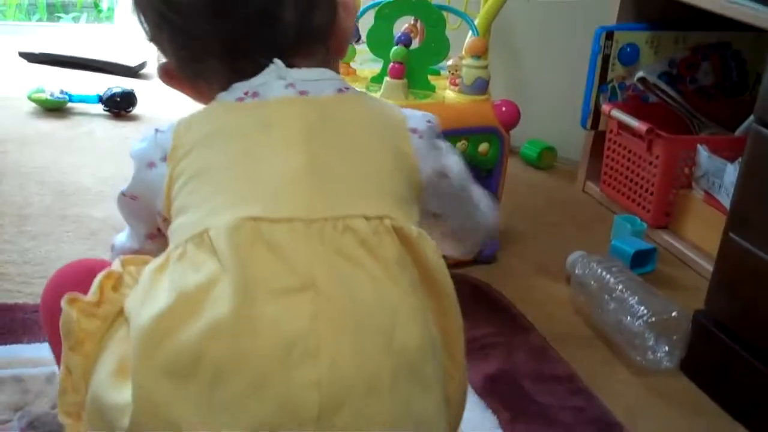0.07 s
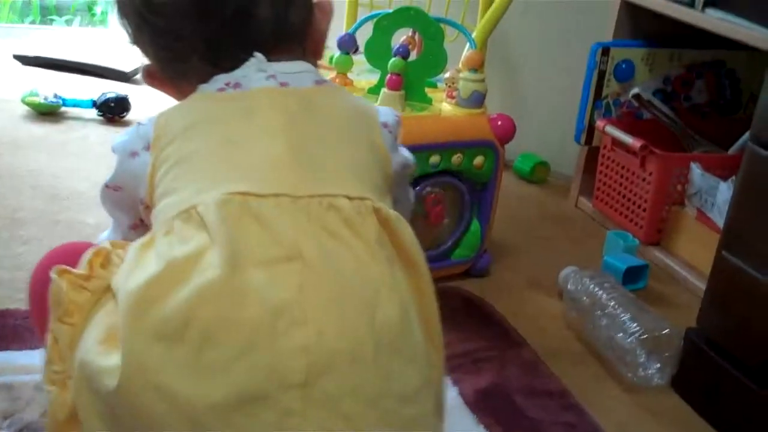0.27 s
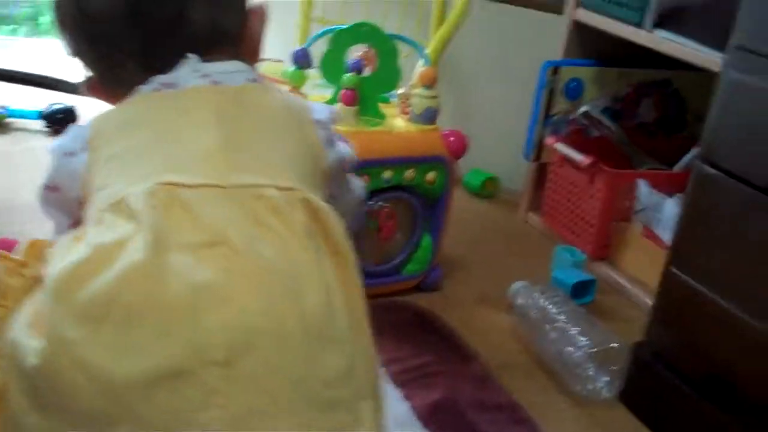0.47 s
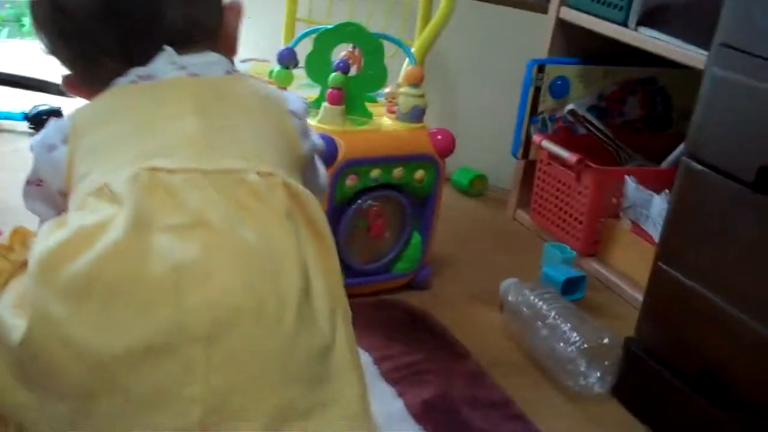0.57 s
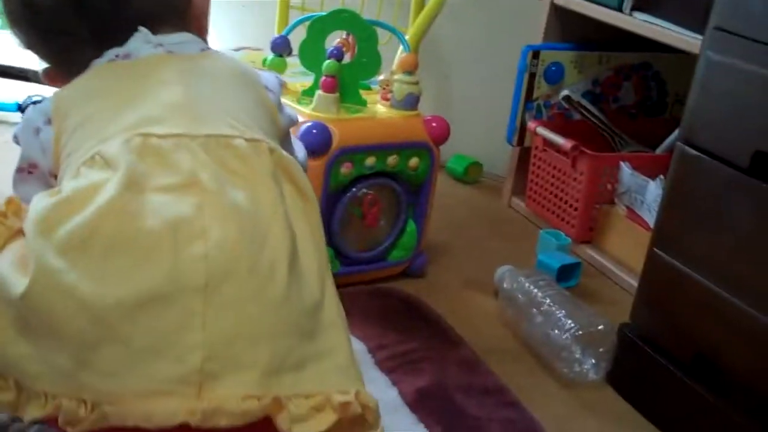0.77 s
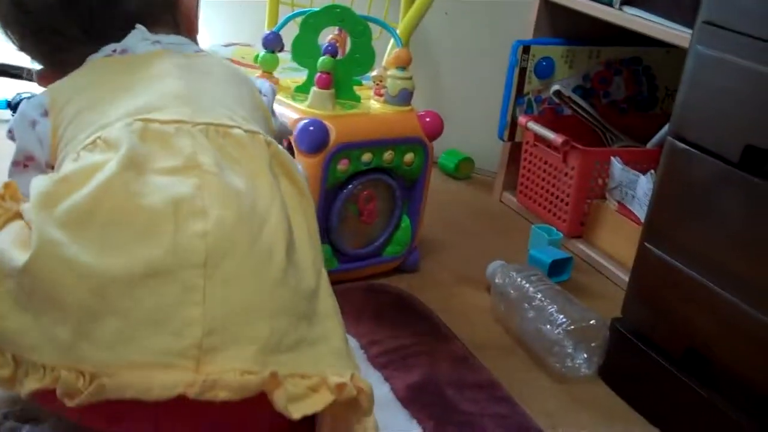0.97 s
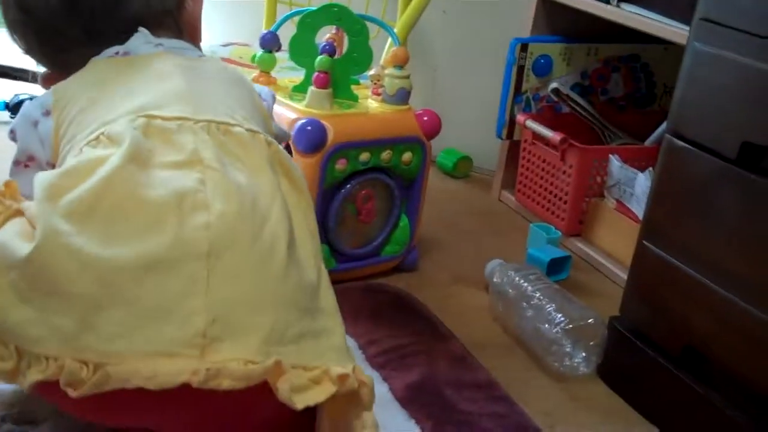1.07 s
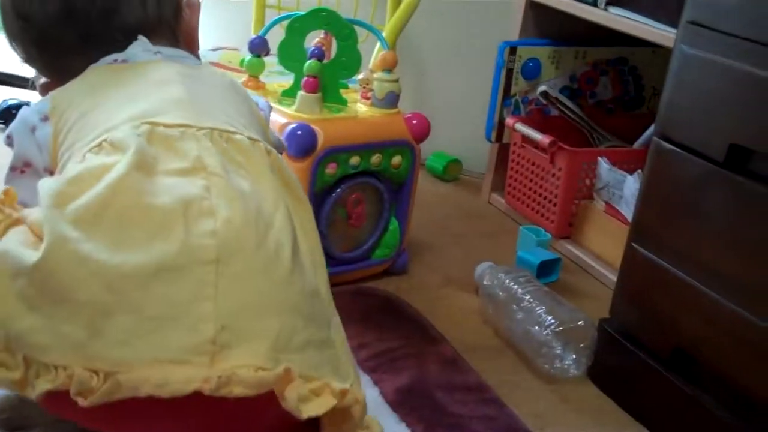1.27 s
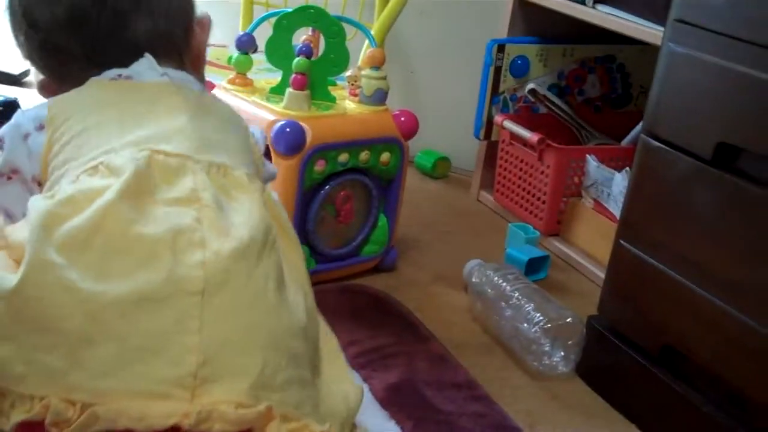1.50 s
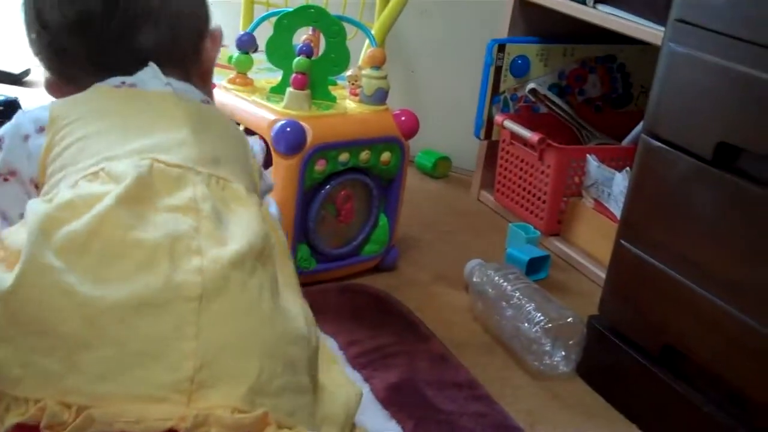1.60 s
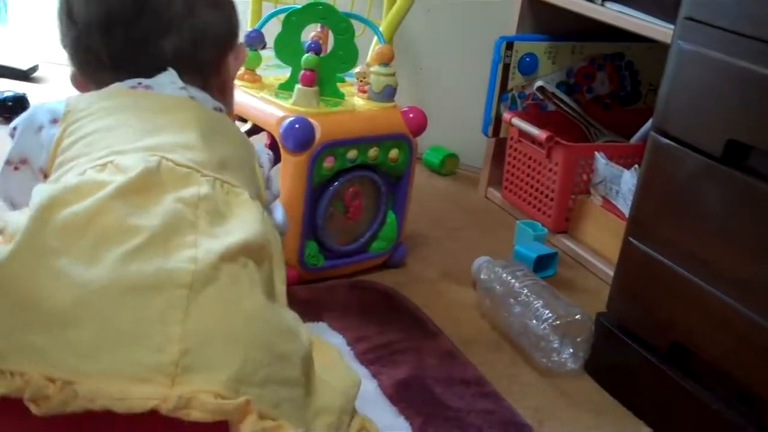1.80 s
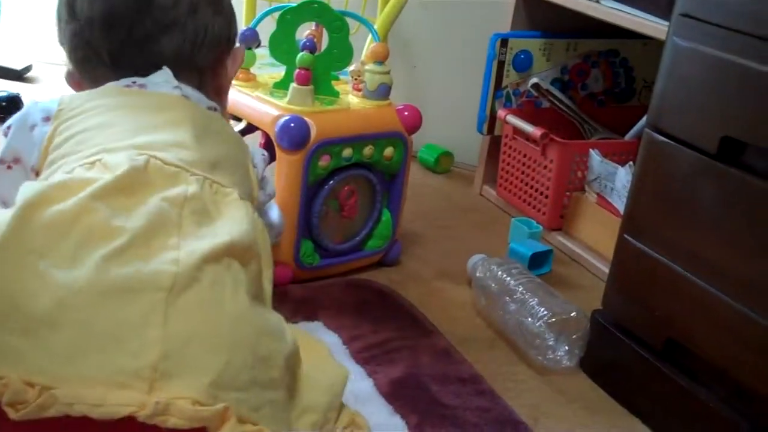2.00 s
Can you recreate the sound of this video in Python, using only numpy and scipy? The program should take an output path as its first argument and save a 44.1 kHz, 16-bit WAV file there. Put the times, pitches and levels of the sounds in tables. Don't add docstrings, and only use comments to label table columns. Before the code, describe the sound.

An empty plastic bottle clatters on a wooden floor in a small furnished room, heard close. Faint hush and cloth rustle, then a sharp double crack at 0.2 s. A light tap follows at 0.3, sliding rub and ticks around 0.5-0.7. The loudest impact comes at 0.95, a hollow bounce at 1.1, soft taps near 1.4, rolling knocks with small dent pops 1.55-1.8, then faint shuffles at 2.0.

```python
import sys
import numpy as np
from scipy import signal
from scipy.fft import rfft, irfft, next_fast_len
from scipy.io import wavfile
from scipy.ndimage import uniform_filter1d

SR = 44100
rng = np.random.default_rng(int(sys.argv[2]) if len(sys.argv) > 2 else 0)


def unload_audio(sound):
    columns = np.transpose(np.atleast_2d(sound))
    steps = np.round(np.clip(columns, -1, 1) * 32767)
    wavfile.write(sys.argv[1], SR, steps.astype(np.int16))


def undo_db(level):
    steps = np.asarray(level, float) / 20
    return 10 ** steps


N = 90404
CONTACT_N = 1 << 15
TAIL_N = CONTACT_N // 2
ROOM_TOP_HZ, TOP_HZ = 14300, 15900


def unit(x):
    return x / np.sqrt(np.mean(x ** 2) + 1e-20)


def along(points, hz):
    f, v = np.transpose(points)
    return np.interp(np.log(hz + 1), np.log(f + 1), v)


def gain_at(points):
    return undo_db(np.interp(np.arange(N) / SR, *np.transpose(points)))


def stereo_noise(n, alike, patchy_db, shape, size=256):
    hz, t, z = signal.stft(rng.standard_normal((2, n)), SR, nperseg=size)
    patches = uniform_filter1d(rng.standard_normal(z.shape[1:]), 4, 0)
    patches = uniform_filter1d(patches, 8, 1)
    turn = np.arccos(np.clip(along(alike, hz), -1, 1))[:, None] / 2
    mid, side = z[0] * np.cos(turn), z[1] * np.sin(turn)
    z = np.array([mid + side, mid - side])
    z = z * shape(hz[:, None], t) * undo_db(patchy_db * unit(patches))
    return unit(signal.istft(z, SR, nperseg=size)[1][:, :n])


def resonances(peaks, f, low_hz):
    scatter_db, scatter_ratio = 1.5, .006
    scatter = rng.standard_normal((len(peaks), 2))
    modes = []
    for k, (hz, width_hz, db) in enumerate(peaks):
        gain = (-1) ** k * undo_db(db + scatter_db * scatter[k, 0])
        centre_hz = hz * (1 + scatter_ratio * scatter[k, 1])
        damping = 1j * f * width_hz
        modes.append(gain * damping / (centre_hz ** 2 - f * f + damping))
    modes = np.array(modes) * (1j * f / (low_hz + 1j * f)) ** 3
    power = np.sum(abs(modes) ** 2, 0)
    return np.array([modes.sum(0), np.sqrt(power)]) / np.sqrt(power.mean())


# freq_hz, density_db_per_hz
HUSH_COLOUR = [(25, -7), (80, -1), (300, -5.5), (1000, -7), (3500, -13), (7300, -5.5), (10000, -20.5),
               (14200, -22.5)]
# freq_hz, left_right_likeness
HUSH_ALIKE = [(60, 0.84), (240, 0.34), (950, 0.52), (3770, 0.057), (15000, 0.06)]


def hush():
    colour = lambda hz, t: undo_db(along(HUSH_COLOUR, hz)) * (hz < ROOM_TOP_HZ)
    return undo_db(-53.5) * stereo_noise(N, HUSH_ALIKE, 1.2, colour, size=2048)


# time_s, level_db
RUSTLE = [(0, -85), (.11, -60), (.19, -81), (.5, -64), (.6, -51), (.75, -77), (1.3, -71), (1.5, -59),
          (1.9, -72), (2.05, -70)]
# freq_hz, density_db_per_hz
CLOTH_COLOUR = [(1500, -40), (4000, 55), (6000, 73), (7300, -77), (8500, -39), (12000, -57)]
# freq_hz, left_right_likeness
ROOM_ALIKE = [(300, 0.99), (1000, 0.92), (3000, 0.25), (8000, 0.012)]


def cloth():
    colour = lambda hz, t: undo_db(along(CLOTH_COLOUR, hz)) * (hz < ROOM_TOP_HZ)
    return gain_at(RUSTLE) * stereo_noise(N, ROOM_ALIKE, 3.5, colour)


# time_s, level_db
RUB = [(.44, -83), (.49, -61), (.55, -57.5), (.6, -52.5), (.66, -53), (.75, -63), (.82, -75)]
# freq_hz, width_hz, level_db
RUB_WALL = [(1080, 360, -13), (1810, 110, 14), (2600, 600, -17)]


def rub():
    colour = lambda hz, t: resonances(RUB_WALL, hz[:, 0], 600)[1, :, None] * (hz < ROOM_TOP_HZ)
    return gain_at(RUB) * stereo_noise(N, ROOM_ALIKE, 1.7, colour, size=1024)


# freq_hz, t60_s
ROOM_DECAY = [(200, 0.11), (500, 0.33), (2000, 0.27), (6000, 0.25), (12000, 0.17)]


def room_tail():
    gap_s, rise_s = 0.00083, 0.0028
    decay = lambda hz, t: undo_db(-60 * t / np.clip(along(ROOM_DECAY, hz), .05, .6))
    tail = stereo_noise(TAIL_N, ROOM_ALIKE, 2.2, decay) / np.sqrt(TAIL_N)
    since_s = np.clip(np.arange(TAIL_N) / SR - gap_s, 0, 1)
    return tail * (1 - np.exp(-since_s / rise_s))


def blow_spectrum(blow_s):
    t = np.arange(CONTACT_N) / SR
    blow = rfft(rng.standard_normal(CONTACT_N) * (t / blow_s) * np.exp(-t / blow_s))
    return blow / np.sqrt(uniform_filter1d(abs(blow) ** 2, size=600) + 1e-9)


# freq_hz, width_hz
BROAD_WALL = (1370, 1500)
# freq_hz, width_hz
BROAD_CRACK = (4600, 4400)
# freq_hz, left_minus_right_db
TREBLE_LEFT = [(6200, 0), (8000, 11), (10000, 13), (12000, 9)]
# freq_hz, left_lead_rad
TREBLE_FLIP = [(4000, 0), (8000, 1.05), (11500, 3.5)]


def contacts(rows, air, wall, crack, blow_s, gain_db, wet_db, cut_hz, pan_db, damping, top_hz=ROOM_TOP_HZ):
    out = np.zeros((2, N + CONTACT_N))
    t, f = np.arange(CONTACT_N) / SR, np.fft.rfftfreq(CONTACT_N, 1 / SR)
    side = np.array([[.5], [-.5]])
    shade_db = along(TREBLE_LEFT, f)
    lead = np.exp(1j * side * along(TREBLE_FLIP, f))

    def damped(peaks, broad):
        return [(hz, w + hz * abs(damping), db) for hz, w, db in peaks] + [(*broad, -5.5)]

    for start_s, wall_db, hollow_db, crack_db, sharp_db in rows:
        blow = blow_spectrum(blow_s)
        parts = np.array([
            undo_db(wall_db) * resonances(damped(wall, BROAD_WALL), f, cut_hz),
            undo_db(hollow_db + 11.5) * resonances(air, f, 53),
            undo_db(crack_db + 10) * resonances(damped(crack, BROAD_CRACK), f, 2170)])
        body = parts[:, 0].sum(0)
        spread = np.linalg.norm(parts[:, 1], axis=0)
        direct = blow * body * (f < top_hz) * undo_db(sharp_db + side * (pan_db + shade_db)) * lead
        room_gain = undo_db(wet_db + side * (0.5 + 0.95 * shade_db))
        room = room_gain * spread * (f < ROOM_TOP_HZ) * rfft(room_tail(), CONTACT_N)
        sound = irfft(direct + room, CONTACT_N) * np.clip(6 - 10 * t, 0, 1)
        out[:, round(start_s * SR):][:, :CONTACT_N] += undo_db(gain_db) * sound
    return out[:, :N]


# freq_hz, width_hz, level_db
HELD_AIR = [(353, 162, -0.5), (470, 310, -2), (956, 154, -2.5)]
# freq_hz, width_hz, level_db
TAP_WALL = [(1070, 130, 1), (1880, 110, 5), (2350, 100, 3)]
TAP_CRACK = [(3660, 900, 4.2)]
# start_s, pitch_hz, width_hz, level_db
POPS = [(0.957, 4760, 160, -10.5), (0.9631, 4010, 120, -17), (1.007, 4860, 80, -43),
        (1.248, 1560, 110, -30.5), (1.268, 4250, 160, -37), (1.2868, 6960, 4000, -34.5),
        (1.359, 4250, 200, -43), (1.376, 4300, 130, -42.5), (1.477, 7300, 600, -36.5),
        (1.424, 323, 40, -33.5), (0.205, 1160, 150, -21.5), (0.2045, 80, 200, -35.5), (0.26, 400, 60, -41),
        (0.66, 3700, 1200, -31.5), (1.0906, 7600, 500, -15), (1.27, 900, 250, -33),
        (1.434, 2100, 50, -31.5), (1.584, 1590, 35, -27), (1.645, 2670, 120, -26), (1.7242, 1310, 120, -26),
        (1.778, 2140, 50, -25), (0.668, 2220, 120, -35), (0.972, 1400, 60, -16), (0.934, 1100, 150, -26),
        (1.094, 940, 200, -23), (1.14, 404, 25, -28)]


def pops():
    out = 0
    for start_s, pitch_hz, width_hz, level_db in POPS:
        out = out + contacts([(start_s, level_db, -99, -99, 0)], HELD_AIR, [(pitch_hz, width_hz, 18)],
                             TAP_CRACK, blow_s=0.001, gain_db=16, wet_db=-1, cut_hz=pitch_hz / 2,
                             pan_db=4.5, damping=0)
    return out


# start_s, wall_db, hollow_db, crack_db, sharp_db
TAPS = [
    (0.3039, -29, -75, -35, 3.5),
    (0.6327, -46, -43, -42, -7),
    (0.661, -21.5, -45, -35, -2.5),
    (0.6703, -34, -58, -46, 7),
    (0.7, -47, -72, -63, -4),
    (1.4006, -40, -45, -44.5, -1),
    (1.4245, -21.5, -42.5, -42, -2),
    (1.4392, -32, -50, -47, 2),
    (1.4796, -47, -44, -47, 1.5),
]


def taps():
    return contacts(TAPS, HELD_AIR, TAP_WALL, TAP_CRACK, blow_s=0.0015, gain_db=14.5,
                    wet_db=1, cut_hz=1220, pan_db=1.5, damping=.03)


# start_s, wall_db, hollow_db, crack_db, sharp_db
TICKS = [
    (0.5521, -20, -54, -26.5, -0.6),
]
# freq_hz, width_hz, level_db
TICK_WALL = [(2460, 3600, 0)]
TICK_CRACK = [(6800, 4400, -32.5), (13100, 4500, 3)]


def ticks():
    return contacts(TICKS, HELD_AIR, TICK_WALL, TICK_CRACK, blow_s=0.00049, gain_db=10.5,
                    wet_db=-8, cut_hz=200, pan_db=9, damping=0.049, top_hz=TOP_HZ)


# start_s, wall_db, hollow_db, crack_db, sharp_db
SETTLE = [
    (1.6205, -22.5, -31, -23.5, 1),
    (1.7245, -21.5, -29, -34, -0.89),
    (1.739, -23, -33, -41, -1.5),
    (1.7768, -17.5, -32, -20.5, -0.61),
    (1.79, -21.5, -32.5, -45, -0.57),
    (1.812, -45, -63, -35, -1.6),
]
# start_s, wall_db, hollow_db, crack_db, sharp_db
SHUFFLES = [
    (1.959, -40.5, -47.5, -51, -12),
    (2, -34.5, -46, -60, -7.5),
]
# freq_hz, width_hz, level_db
SETTLE_WALL = [(900, 53, 5), (1330, 160, 6), (2140, 28, 8.5), (2940, 43, 2)]
SETTLE_CRACK = [(6020, 80, 11.3), (7300, 250, 14), (8240, 71, 8.3)]


def settle():
    return contacts([*SETTLE, *SHUFFLES], HELD_AIR, SETTLE_WALL, SETTLE_CRACK, blow_s=0.00099, gain_db=12,
                    wet_db=1.5, cut_hz=310, pan_db=4, damping=0.047)


# start_s, wall_db, hollow_db, crack_db, sharp_db
TIP = [
    (1.577, -19, -55, -17, -3.5),
    (1.599, -15, -27.5, -34, -2.7),
    (1.609, -24, -32.5, -40, 2),
]
# freq_hz, width_hz, level_db
TIP_WALL = [(880, 60, -8), (1590, 28, -2), (2240, 130, -0.5), (3610, 93, -10)]
TIP_CRACK = [(4470, 110, 11), (4800, 50, 12.6), (5300, 360, 8.6), (7850, 160, 3.7), (8600, 100, 6.1)]


def tip():
    return contacts(TIP, HELD_AIR, TIP_WALL, TIP_CRACK, blow_s=0.0016, gain_db=12,
                    wet_db=0.9, cut_hz=640, pan_db=2.5, damping=0.032)


# start_s, wall_db, hollow_db, crack_db, sharp_db
ROLL = [
    (1.542, -16, -27, -32.5, -1.4),
    (1.649, -10, -28.5, -21, -2.6),
    (1.671, -19.5, -29, -37, -1.6),
]
# freq_hz, width_hz, level_db
ROLL_WALL = [(1200, 170, -2.5), (2090, 60, -4.5), (2620, 80, -0.5), (2940, 44, -4), (3500, 80, -5.5)]
ROLL_CRACK = [(4300, 110, 5.7), (5300, 100, 3.9), (5850, 100, 4.3), (7260, 180, 6.2)]


def roll():
    return contacts(ROLL, HELD_AIR, ROLL_WALL, ROLL_CRACK, blow_s=0.00091, gain_db=12,
                    wet_db=1.54, cut_hz=530, pan_db=1.5, damping=0.047)


# freq_hz, width_hz, level_db
HOLLOW_AIR = [(139, 61, -14), (260, 164, -9.5), (400, 47.5, 2.5), (566, 49, -4.5), (900, 330, -6.5)]
# start_s, wall_db, hollow_db, crack_db, sharp_db
BOUNCE = [
    (1.091, -6, -21, -8.5, 0.8),
    (1.103, -7.5, -23.5, -33, -2.5),
    (1.123, -29, -21, -17.5, -8),
    (1.145, -14, -26, -21.5, -5),
    (1.164, -18, -28.5, -32, -1.5),
    (1.217, -36, -53, -36, -10),
]
# freq_hz, width_hz, level_db
BOUNCE_WALL = [(1117, 57, -1), (2050, 22, -7), (2360, 30, 2), (2730, 24, -1.5), (2860, 28, 1)]
BOUNCE_CRACK = [(4750, 180, -0.26), (4700, 29, -0.68), (6060, 74, -0.85), (6800, 59, -1.2),
                (7710, 33, -1.3)]


def bounce():
    return contacts(BOUNCE, HOLLOW_AIR, BOUNCE_WALL, BOUNCE_CRACK, blow_s=0.0013, gain_db=10.5,
                    wet_db=2.5, cut_hz=680, pan_db=2.5, damping=0.039)


# start_s, wall_db, hollow_db, crack_db, sharp_db
FALL = [
    (0.892, -31, -59, -41, -4.5),
    (0.926, -26, -58, -39, 3),
    (0.93, -9.5, -24, -34.5, -0.3),
    (0.937, -30, -30, -33, -6),
    (0.957, 4, -21.5, -12.5, -0.26),
    (0.963, -9, -27, -29, 2),
    (0.977, -11, -26, -45, 6.5),
    (1.006, -12.5, -29.5, -28, -4),
]
# freq_hz, width_hz, level_db
FALL_WALL = [(1320, 880, 6.5), (2190, 25, 1.5), (2410, 28, 6.5), (3040, 91, 1), (3000, 34, -13)]
FALL_CRACK = [(3900, 170, 8.8), (4820, 61, 9.9), (5970, 67, 13.7), (7100, 22, 1.1), (7600, 19, 8.1)]


def fall():
    return contacts(FALL, HOLLOW_AIR, FALL_WALL, FALL_CRACK, blow_s=0.0014, gain_db=12,
                    wet_db=0.5, cut_hz=900, pan_db=0.5, damping=0.032)


# start_s, wall_db, hollow_db, crack_db, sharp_db
SNAPS = [
    (0.2047, -2, -39, -12, 4.5),
    (0.2064, 0, -31, -12.5, -3.5),
]
# freq_hz, width_hz, level_db
SNAP_WALL = [(1600, 94, -2.5), (1950, 200, 7), (2070, 44, -29), (3450, 2500, -9)]
SNAP_CRACK = [(3980, 410, 7.5), (5400, 310, 8), (6730, 190, 6), (8600, 520, -2.5), (11300, 250, -17)]


def snap():
    return contacts(SNAPS, HELD_AIR, SNAP_WALL, SNAP_CRACK, blow_s=0.00099, gain_db=13.5,
                    wet_db=-2.5, cut_hz=1330, pan_db=0.5, damping=0.043, top_hz=TOP_HZ)


# freq_hz, level_db
MIC = [(60, -7.5), (250, -6), (500, -3.5), (7500, -1.5), (9500, -14), (13000, -19), (15900, -15)]


def scene():
    background = hush() + cloth() + rub()
    bottle = pops() + taps() + ticks() + settle() + tip() + roll() + bounce() + fall() + snap()
    m = next_fast_len(N + CONTACT_N)
    f = np.fft.rfftfreq(m, 1 / SR)
    colour = undo_db(along(MIC, f)) * (f < TOP_HZ)
    return irfft(rfft(bottle, m) * colour, m)[:, :N] + background


def top_cut(x):
    return signal.sosfilt(signal.butter(12, 15920, fs=SR, output="sos"), x)


def record(dry):
    mix = dry / (1 + abs(dry) ** 8) ** (1 / 8)
    return top_cut(mix)


dry = scene()
out = record(dry)
unload_audio(out)
```